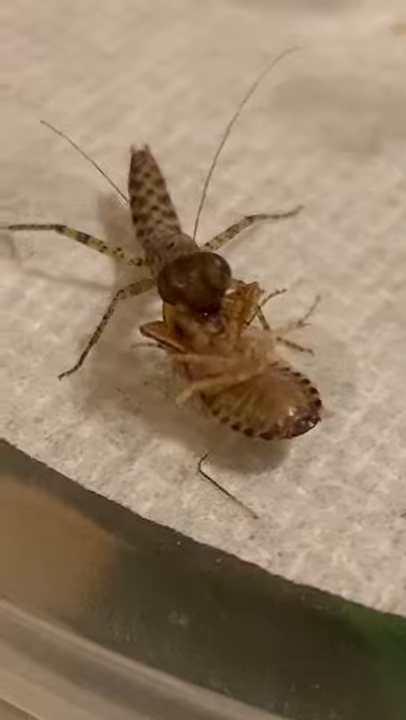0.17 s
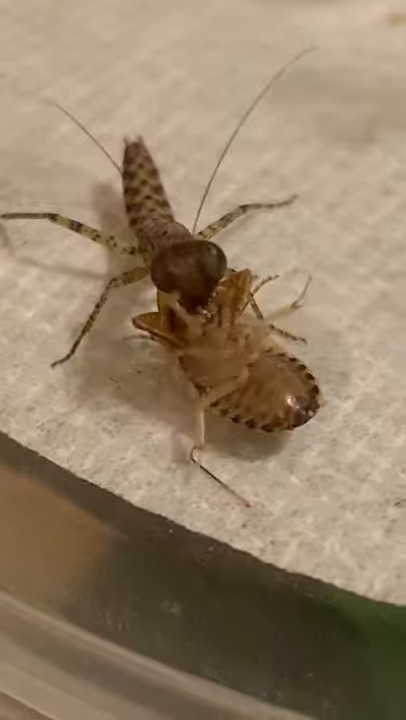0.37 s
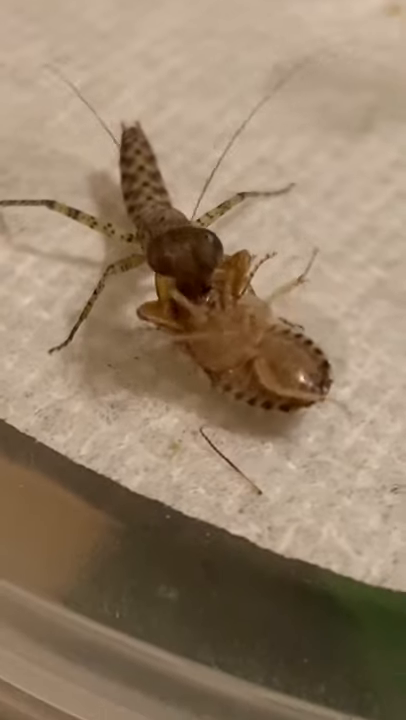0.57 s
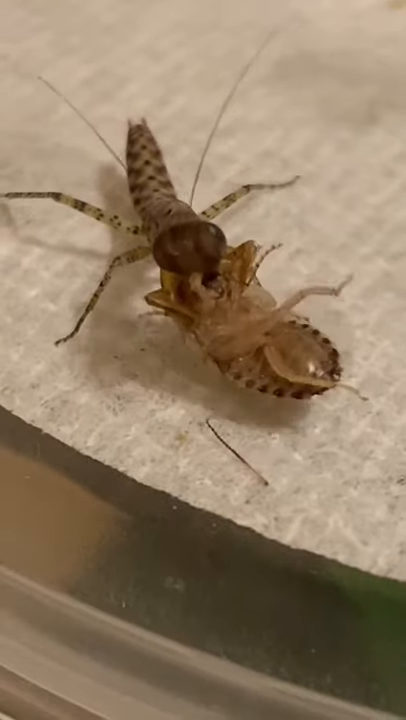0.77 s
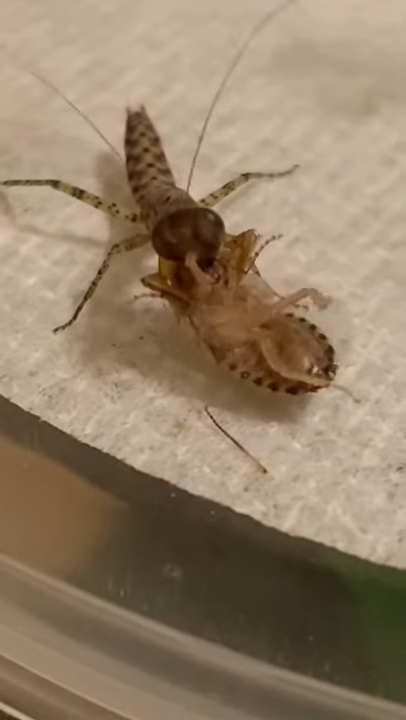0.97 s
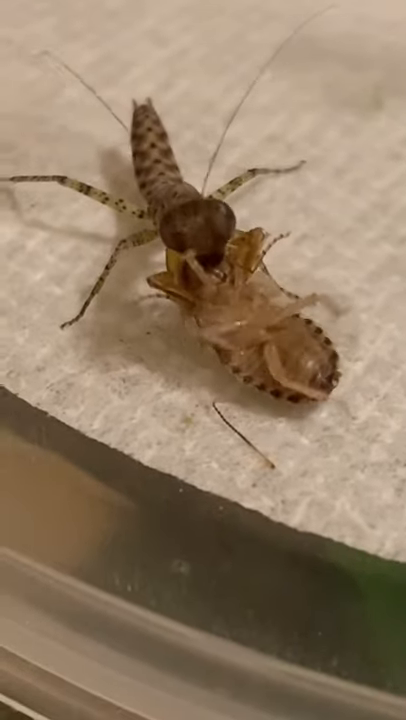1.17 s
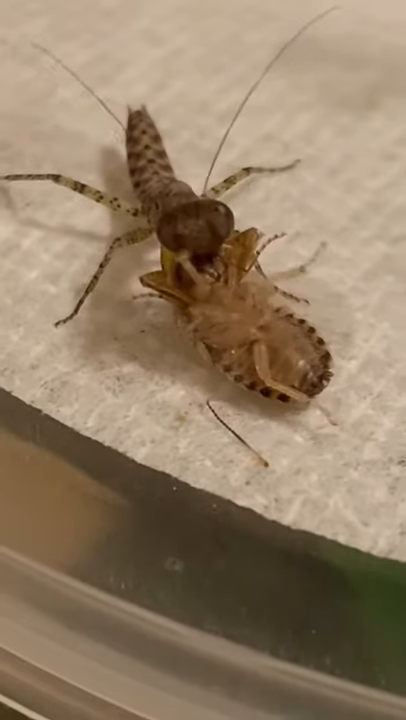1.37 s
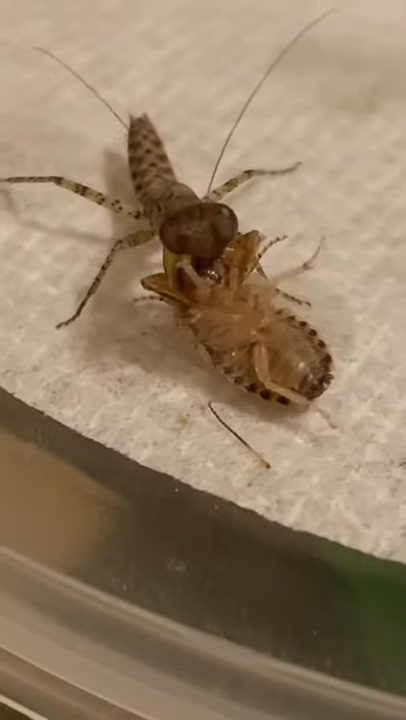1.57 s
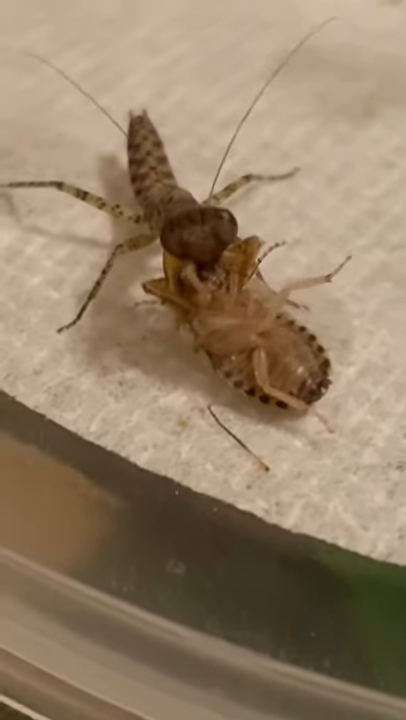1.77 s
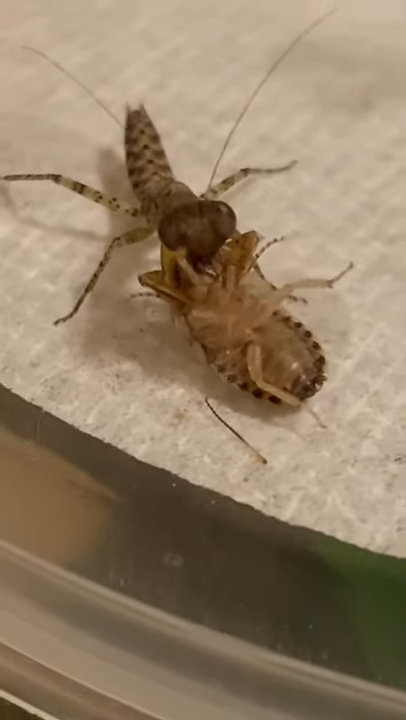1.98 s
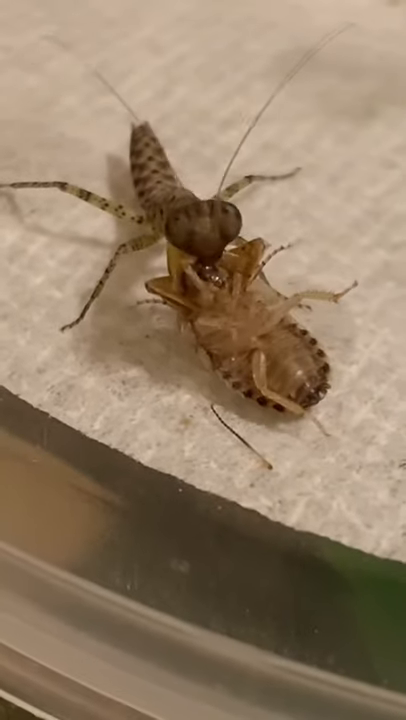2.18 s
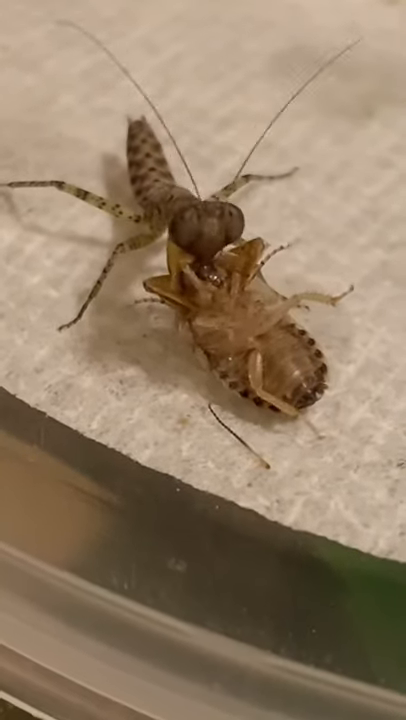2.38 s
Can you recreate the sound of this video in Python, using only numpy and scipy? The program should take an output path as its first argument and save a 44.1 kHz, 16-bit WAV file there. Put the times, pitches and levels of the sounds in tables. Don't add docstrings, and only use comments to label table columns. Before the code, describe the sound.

A small insect chewing prey, faint dry ticks and crackly scratching over low room rumble

```python
import sys
import numpy as np
from scipy import signal
from scipy.fft import rfft, irfft, next_fast_len
from scipy.io import wavfile
from scipy.ndimage import uniform_filter1d

SR = 44100
rng = np.random.default_rng(int(sys.argv[2]) if len(sys.argv) > 2 else 0)


def to_linear_factor(level_db):
    exponent = np.asarray(level_db, float) / 20
    return 10 ** exponent


def persist_wave(psi):
    counts = np.round(np.clip(psi, -1, 1) * 32767).astype(np.int16)
    wavfile.write(sys.argv[1], SR, np.atleast_2d(counts).T)


N = 111573
START_S = .03628


def evened(x):
    return x / np.sqrt(np.mean(x ** 2) + 1e-20)


def read(points, hz):
    f, value = np.transpose(points)
    return np.interp(np.log(hz + 1), np.log(f + 1), value)


def follow(points, x):
    return np.interp(x, *np.transpose(points))


def drift(shape, size):
    smooth = uniform_filter1d(rng.standard_normal(shape), size)
    return evened(uniform_filter1d(smooth, size))


def ring(x, modes):
    t = np.arange(2048) / SR
    tap = 0
    for k, (hz, width, db) in enumerate(modes):
        tap = tap + (-1) ** k * to_linear_factor(db) * np.exp(-np.pi * width * t) * np.sin(2 * np.pi * hz * t)
    return signal.oaconvolve(x, tap[None] / abs(tap).max(), axes=-1)[..., :N]


def shaped(gain_db, size):
    z = rng.standard_normal((2, 2) + gain_db.shape)
    spectrum = (z[0] + 1j * z[1]) * to_linear_factor(gain_db)
    return evened(signal.istft(spectrum, nperseg=size, noverlap=size * 3 // 4)[1][:, :N])


# (frequency [Hz], density [dB per Hz])
RUMBLE_COLOUR = [(20, -45), (32, -23), (45, -4), (76, -5), (110, -6.5), (258, -18), (355, -25),
                 (385, -34.5), (700, -45.5)]
# (frequency [Hz], width [Hz], lift [dB], wander [share of frequency])
ROOM_MODES = [(50, 9, 11, .05), (97, 16, -4, .03), (140, 16, 7, .1), (205, 14, 7, .05), (262, 14, 6, .05),
              (340, 16, 7, .04)]
# (time [s], level [dB])
RUMBLE_SWELLS = [(.04, -12), (.11, 1), (.28, -1.5), (.5, -3.5), (.7, -1), (.9, -2), (1.08, -2.5),
                 (1.25, -1.5), (1.6, -1), (2.0, -3), (2.36, -0.5), (2.46, -2)]


def rumble():
    level_db = -49.5
    hz = np.fft.rfftfreq(4096, 1 / SR)[:, None]
    t = np.arange(N // 1024 + 5) * 1024 / SR
    lift = 0
    for f, width, db, wander in ROOM_MODES:
        centre = f * (1 + wander * drift(len(t), size=7))
        lift = lift + db / (1 + (2 * (hz - centre) / width) ** 2)
    colour = read(RUMBLE_COLOUR, hz) - 60 * (hz > 900)
    return to_linear_factor(level_db) * shaped(colour + lift + follow(RUMBLE_SWELLS, t), size=4096)


# (frequency [Hz], level [dB])
HISS_COLOUR = [(400, 10), (700, -7.5), (1500, -5.5), (3000, -14.5), (5200, -7), (8000, -18.5),
               (12000, -8.5), (16000, -19)]


def hiss():
    level_db, lull_s, lull_half_s = -75, .487, 0.0062
    hz = np.fft.rfftfreq(512, 1 / SR)[:, None]
    frames = N // 128 + 5
    t = np.arange(frames) * 128 / SR
    patches = evened(uniform_filter1d(drift((257, frames), size=12), size=8, axis=0))
    lull = 9 * np.exp(-((t - lull_s) / lull_half_s) ** 2)
    colour = read(HISS_COLOUR, hz) - 40 * (hz < 350)
    return to_linear_factor(level_db) * shaped(colour + 4.1 * patches - lull, size=512)


# (time [s], level [dB rms])
HUM_SWELLS = [(.04, -45), (.12, -55.5), (.2, -50.5), (.28, -43.5), (.36, -58), (.5, -50), (.58, -65),
              (.66, -45.5), (.8, -56), (.88, -64.5), (1.08, -43.5), (1.17, -60.5), (1.6, -56.5), (1.9, -57),
              (2.18, -53), (2.26, -58), (2.35, -51), (2.5, -61)]


def hum():
    hum_hz = 75.83
    t = np.arange(N) / SR
    return to_linear_factor(follow(HUM_SWELLS, t)) * np.sqrt(2) * np.sin(2 * np.pi * hum_hz * t)


def thump():
    level_db, ring_hz, t60_s, turn = -35, 70, .2, .78
    t = np.maximum(np.arange(N) / SR - START_S, 0)
    return to_linear_factor(level_db - 60 * t / t60_s) * np.sin(2 * np.pi * (ring_hz * t + turn))


# (time [s], ring [Hz], level [dB])
FIBRE_SNAPS = [(.0985, 1600, -54), (0.4645, 4640, -60), (0.1048, 2450, -60), (0.106, 7250, -57),
               (.111, 7040, -57), (.126, 7400, -66), (.3715, 9200, -69), (.4538, 6400, -51.5),
               (.4538, 10600, -56), (.457, 6500, -55), (0.46, 7900, -56), (0.623, 6100, -55),
               (.628, 6100, -53), (.632, 6500, -56), (0.633, 3940, -69), (1.137, 2450, -65.5),
               (1.1765, 6700, -54), (1.3088, 6860, -57), (1.529, 2240, -61.5), (1.53, 1700, -68.5),
               (1.535, 2440, -73), (1.7745, 2170, -68), (1.7795, 6500, -49.5), (1.8213, 8250, -52),
               (1.825, 6000, -47), (1.9174, 6200, -51), (1.918, 9900, -59.5), (1.924, 2400, -68),
               (1.965, 3800, -67), (1.9915, 2300, -60), (1.994, 1690, -61), (2.006, 3800, -69),
               (2.073, 6700, -64), (2.191, 6600, -53), (2.2207, 6450, -53), (2.23, 6460, -53),
               (2.2835, 7700, -62), (2.4225, 6400, -53), (2.475, 6300, -61)]
# (centre [s], half length [s], ring [Hz], level [dB rms])
FIBRE_RUBS = [(0.078, 0.017, 6550, -68), (0.378, 0.015, 9000, -75), (0.631, 0.017, 1056, -73),
              (0.638, 0.013, 6700, -76), (.505, .012, 7750, -76.5), (1.049, .025, 1250, -80),
              (1.155, 0.066, 6870, -75), (1.196, 0.036, 7030, -82), (1.33, 0.024, 6700, -89),
              (1.708, 0.02, 8500, -76), (1.753, 0.045, 6070, -71.5), (1.768, .025, 1080, -77),
              (1.785, 0.013, 8500, -72), (1.836, .008, 7260, -72), (1.972, 0.019, 8600, -75),
              (1.975, 0.016, 6760, -76), (2.016, 0.011, 3800, -73), (2.056, 0.031, 4000, -74),
              (2.207, .008, 6240, -65.5), (2.233, 0.01, 6730, -64), (2.296, 0.018, 1040, -72),
              (2.308, .012, 7000, -71), (2.408, 0.011, 3850, -77), (2.451, 0.011, 6700, -72.5)]


def fibres():
    snap_cycles = 38.4
    rub_sharpness, grains_per_s = 15, 2500
    t = np.arange(6000) / SR
    out = np.zeros((2, N + 6000))
    for s, hz, db in FIBRE_SNAPS:
        at = round(s * SR) - 20
        attack = np.minimum(t * hz / 2, 1)
        snap = to_linear_factor(db - 60 * t * hz / snap_cycles) * attack * np.sin(2 * np.pi * hz * t)
        out[:, at:at + 6000] += snap * [[1], [.3]]
    for s, half, hz, db in FIBRE_RUBS:
        grains = rng.standard_normal((2, 6000)) * (rng.random((2, 6000)) < grains_per_s / SR)
        start = max(s - 3000 / SR, 0)
        at = round(start * SR)
        squeal = evened(ring(grains, [(hz, hz / rub_sharpness, 0)])[:, :6000])
        swell = np.exp(-((t + start - s) / half) ** 2)
        out[:, at:at + 6000] += squeal * to_linear_factor(db) * swell
    return out[:, :N]


# (frequency [Hz], width [Hz], level [dB])
LOW_MODES = [(1021, 124, 17.6), (1402, 500, 19.7)]
DULL_MODES = [(2450, 1500, 0), (1750, 220, -12), (2380, 110, -4)]
MIDDLE_MODES = [(3300, 600, -26), (3906, 440, -13)]
BRIGHT_MODES = [(5840, 600, -1.5), (7000, 2600, 4), (8440, 1600, 3), (10400, 290, -16), (14000, 630, -16.5)]
# (frequency [Hz], width [Hz], level [dB])
BRIGHT_PATCHES = [(6440, 1600, -9.5), (6700, 310, -4.5), (7300, 310, -8), (8530, 730, -17)]
# (time [s], scratch level [dB], dull share [dB])
CHEWING = [(.04, -68, 1.5), (.12, -81.5, -1.5), (0.159, -81, 0.5), (.39, -77.5, -4.5), (.5, -82, -4),
           (.635, -85.5, 9.5), (.69, -84.5, -1), (0.881, -77, 0.5), (1.0, -80, 0.5), (1.14, -80.5, 1.5),
           (1.4, -76.5, -6.5), (1.621, -87.5, 1.5), (1.779, -75, 1.5), (1.98, -77, -2.5), (2.152, -84, -8),
           (2.22, -72, -7), (2.36, -82, 1), (2.47, -79, -9)]
# (centre [s], half length [s], lift [dB])
SCRATCH_SURGES = [(0.114, 0.011, 10.5), (0.45, 0.008, 5), (0.494, 0.013, -7), (0.625, 0.012, 2),
                  (0.885, 0.0077, 7.5), (1.792, 0.013, -0.5), (1.811, 0.0073, -6), (1.87, 0.02, -9.5),
                  (1.945, 0.014, -2.5), (2.08, 0.018, 1.5), (2.108, 0.027, 9), (2.245, 0.017, 1),
                  (2.316, 0.028, 3), (2.406, 0.03, 7), (2.472, 0.04, 5.5), (2.528, 0.0048, 5)]


def scratching():
    clicks_per_s, spread_db, clump_db = 5000, 3.5, 2.6
    t = np.arange(N) / SR
    s, level_db, dull_db = np.transpose(CHEWING)
    level, dull = np.interp(t, s, level_db), np.interp(t, s, dull_db)
    for at, half, db in SCRATCH_SURGES:
        level = level + db * np.exp(-((t - at) / half) ** 2)
    layers = [(LOW_MODES, -1.5 + 1.24 * dull), (DULL_MODES, -5.5 + dull),
              (MIDDLE_MODES, -3.5 + .5 * dull), (BRIGHT_MODES, -8 + 3.5)]
    layers += [([(hz, width, 0)], db) for hz, width, db in BRIGHT_PATCHES]
    clump = drift(N, size=600)
    out = 0
    for modes, db in layers:
        size = to_linear_factor(spread_db * np.minimum(rng.exponential(1, (2, N)), 4))
        size = size * rng.choice([-1., 1.], (2, N))
        clicks = size * (rng.random((2, N)) < clicks_per_s / SR)
        patches = clump_db * (0.68 * clump + 1.0 * drift(N, size=1200))
        out = out + evened(ring(clicks, modes)) * to_linear_factor(db + level + patches)
    return out


# (time [s], low part [dB], dull part [dB], middle part [dB], bright part [dB])
BITES = [(.087, -70, -83, -84, -56), (0.097, -53, -43.5, -53.5, -68), (.2294, -80, -71, -92, -53.5),
         (0.323, -84, -60.5, -68, -82), (0.4529, -89, -94, -63, -49.5), (0.468, -96, -93, -59.5, -62),
         (0.871, -67.5, -86, -57, -72), (1.129, -78, -83, -84, -61), (1.226, -66, -65.5, -63, -82),
         (1.527, -69, -55, -82, -79), (1.774, -81, -63, -85, -70), (1.8211, -64, -58.5, -53, -49),
         (1.9174, -74, -64, -67, -73), (1.9909, -60.5, -64, -72, -89), (2.19, -90, -68, -73, -53),
         (2.2227, -68, -76, -74, -61), (2.23, -78, -90, -62, -52), (2.42, -70.5, -71, -62, -70)]
RUSTLE_PARTS = [-25, -11, -2.5, -2]


def ticks():
    crumb_size, crumb_tail_s = .15, .006
    rustle_size, rustle_tail_s = 0.059, 0.072
    t = np.arange(3000) / SR
    rustle = rustle_size * to_linear_factor(np.array(RUSTLE_PARTS))[:, None, None] * np.exp(-t / rustle_tail_s)
    fade = crumb_size * np.exp(-t / crumb_tail_s) + rustle
    drive = np.zeros((4, 2, N + 3000))
    for s, *parts_db in BITES:
        crumbs = rng.standard_normal((4, 2, 3000)) * (rng.random((4, 2, 3000)) < .08) * fade
        crumbs[:, :, :8] = 0
        crumbs[:, 0, 0], crumbs[:, 1, 3] = 1, .6
        at = round(s * SR)
        drive[:, :, at:at + 3000] += crumbs * to_linear_factor(np.array(parts_db))[:, None, None]
    parts = (LOW_MODES, DULL_MODES, MIDDLE_MODES, BRIGHT_MODES)
    return sum(ring(d, modes) for d, modes in zip(drive, parts))


# (frequency [Hz], left minus right [dB])
PORT_BALANCE = [(60, -0.5), (110, -2), (200, -2.5), (380, -1.5), (700, 0), (1290, 1), (2380, -4),
                (4400, 0.5), (8120, -0.5), (15000, 2.5)]


def ports(pair, likeness, leads):
    size = next_fast_len(N + 4096)
    hz = np.fft.rfftfreq(size, 1 / SR)
    a, b = rfft(pair, size)
    same = np.clip(read(likeness, hz), 0, 1)
    half = to_linear_factor(read(PORT_BALANCE, hz) / 2) * np.exp(.5j * follow(leads, hz))
    left = a * half
    right = (same * a + np.sqrt(1 - same ** 2) * b) / half
    return irfft(np.array([left, right]), size)[:, :N]


# (frequency [Hz], likeness [0-1])
ROOM_SAME = [(60, .995), (130, .975), (290, .9), (640, .6), (3000, .65), (6000, .9), (8500, .985),
             (15000, .985)]
TUB_SAME = [(640, .75), (1400, .8), (3000, .85), (6000, .93), (8500, .985), (15000, .985)]
# (frequency [Hz], lead [radians])
ROOM_LEAD = [(0, 0), (330, .25), (560, 3), (5200, 3.1), (6200, 4.8), (8600, 6.28), (12300, 9.42),
             (15600, 12.57)]
TUB_LEAD = [(0, 0), (1100, 1.1), (2330, 1.3), (4200, 1.5), (5200, 3.1), (6200, 4.8), (8600, 6.28),
            (12300, 9.42), (15600, 12.57)]


def scene():
    room = ports(rumble() + hiss(), ROOM_SAME, ROOM_LEAD)
    tub = ports(scratching() + ticks() + fibres(), TUB_SAME, TUB_LEAD)
    return room + tub + thump() + hum()


# (from [Hz], to [Hz])
WEAK_BANDS = [(2750, 3100), (4800, 5150), (5150, 5500), (700, 850)]
OPEN_MOMENTS = (.455, 1.82, 2.19, 2.41, 2.425)


def thinned(x):
    ragged_hz, weak_share = 260, .16
    mid_top_hz, side_top_hz = 15750, 14700
    hz, t, z = signal.stft([x[0] + x[1], x[0] - x[1]], SR, nperseg=1024)
    edges = np.array([(11250, 13500, mid_top_hz), (7500, 9650, side_top_hz)]).T[..., None]
    wobble = np.repeat(drift((3, 2, len(t)), size=2), 2, axis=2)[..., :len(t)]
    low, high, top = (edges + ragged_hz * np.round(wobble))[:, :, None]
    both_kept = abs(t[:, None] - OPEN_MOMENTS).min(axis=1) < .012
    f = hz[:, None]
    keep = ((f < low) | (f > high) | both_kept) & (f < np.minimum(top, mid_top_hz))
    for lo_hz, hi_hz in WEAK_BANDS:
        band = (hz > lo_hz) & (hz < hi_hz)
        power = uniform_filter1d((abs(z[0, band]) ** 2).sum(axis=0), size=3)
        keep[0, band] &= power > np.quantile(power, weak_share)
    mid, side = signal.istft(z * keep, SR, nperseg=1024)[1][:, :N]
    return np.array([mid + side, mid - side]) / 2


def roll_off(x):
    return signal.sosfilt(signal.butter(12, 16480, fs=SR, output="sos"), x)


def record(dry):
    low_cut = signal.butter(4, 37, "highpass", fs=SR, output="sos")
    mix = thinned(signal.sosfilt(low_cut, dry))
    started = np.arange(N) >= START_S * SR
    return roll_off(mix * started)


dry = scene()
out = record(dry)
persist_wave(out)
```